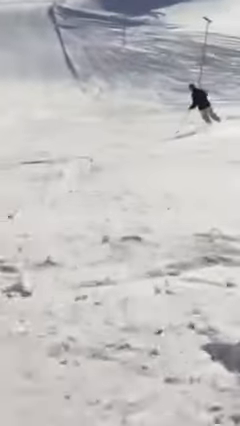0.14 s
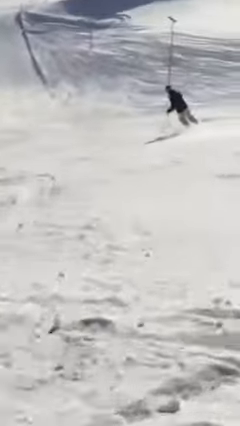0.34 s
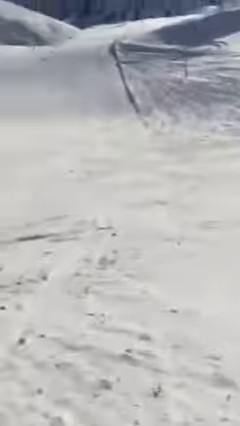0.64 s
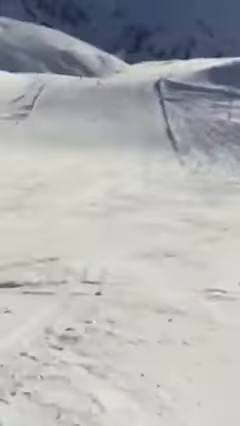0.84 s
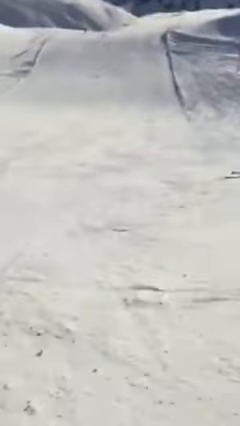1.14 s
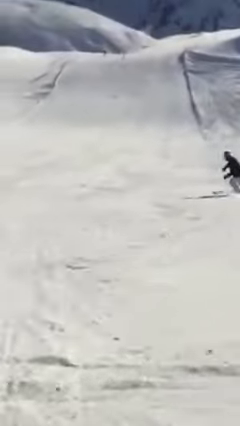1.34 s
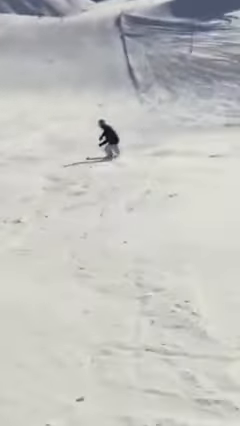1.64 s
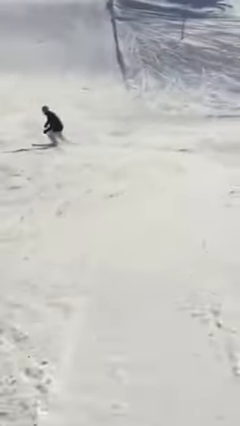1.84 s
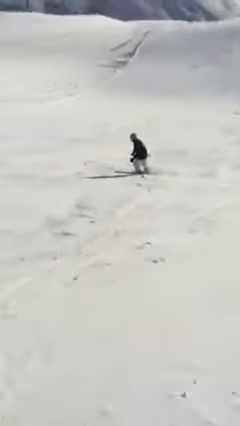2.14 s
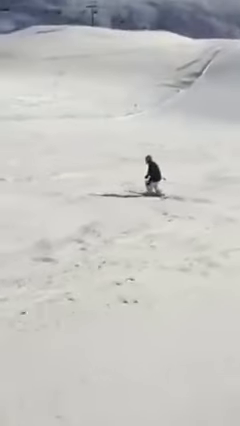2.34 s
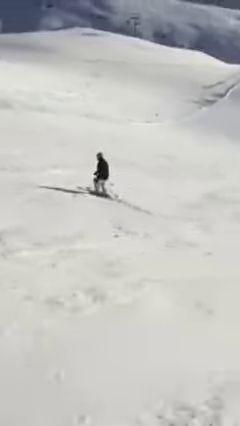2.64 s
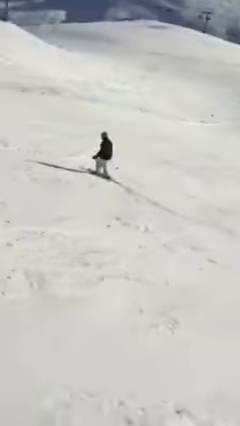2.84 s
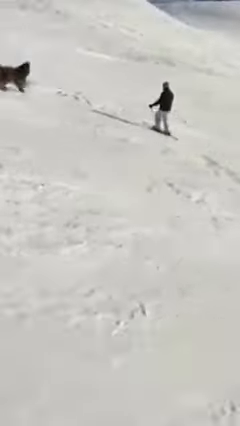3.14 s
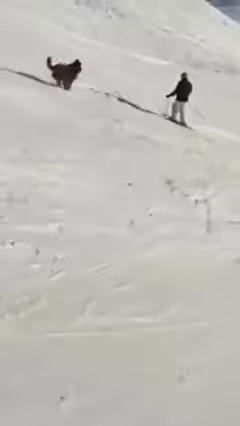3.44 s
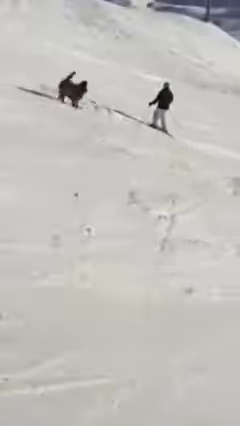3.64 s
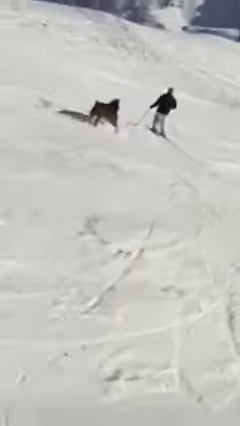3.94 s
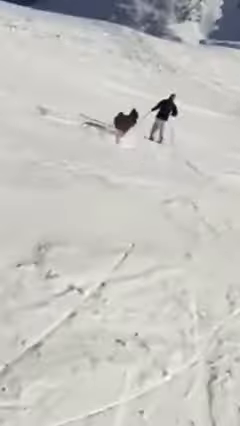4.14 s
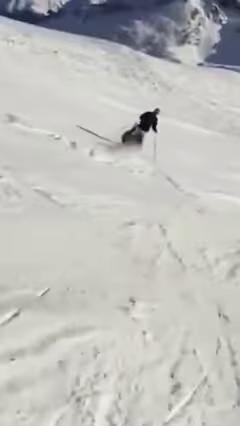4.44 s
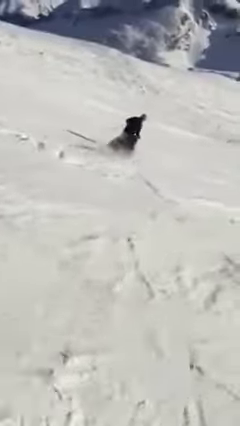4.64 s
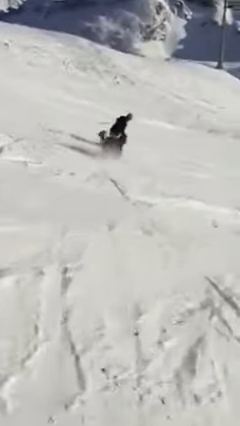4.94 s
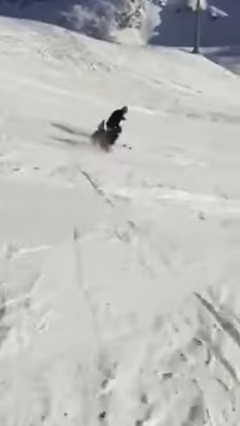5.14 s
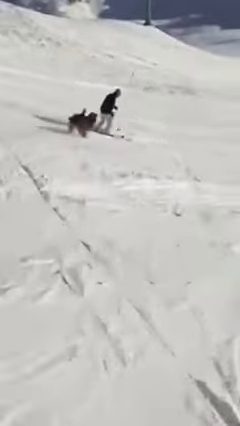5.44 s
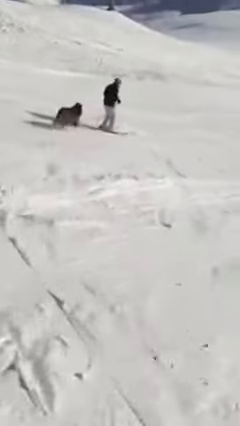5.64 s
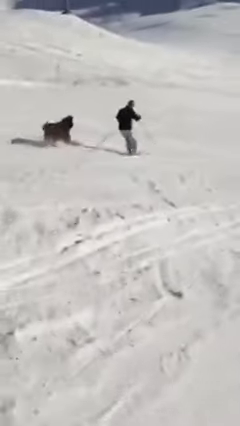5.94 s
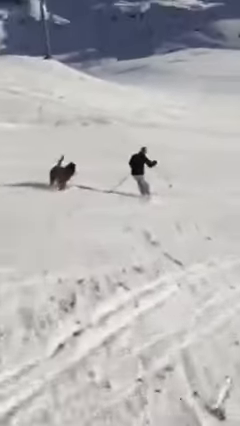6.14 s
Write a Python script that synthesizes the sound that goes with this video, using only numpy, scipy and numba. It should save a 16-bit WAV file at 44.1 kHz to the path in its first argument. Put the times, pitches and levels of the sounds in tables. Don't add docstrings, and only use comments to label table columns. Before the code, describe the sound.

A grainy rush of skis across a snowy slope swells loudest midway, with cracking crust, a plastic clack, a ski slap and wind thumps.

```python
import sys
import numpy as np
from scipy import signal
from scipy.fft import rfft, irfft, next_fast_len
from scipy.io import wavfile
from scipy.ndimage import uniform_filter1d
from numba import njit

SR = 44100
rng = np.random.default_rng(int(sys.argv[2]) if len(sys.argv) > 2 else 0)


def wav_out(sig):
    wavfile.write(sys.argv[1], SR, np.round(np.clip(np.atleast_2d(sig).T, -1, 1) * 32767).astype(np.int16))


def linear_from_db(decibels):
    return 10 ** (np.asarray(decibels, float) / 20)


N = 276948


def level(x, db):
    return x * linear_from_db(db) / np.sqrt(np.mean(x ** 2))


@njit
def svf(x, hz, width_hz):
    y = np.empty(len(x))
    band, low = 0., 0.
    g, k = np.tan(np.pi * hz / SR), width_hz / hz
    for i in range(len(x)):
        v = (band + g * (x[i] - low)) / (1 + g * (g + k))
        band = 2 * v - band
        low = low + 2 * g * v
        y[i] = k * v
    return y


def walk(rate_hz):
    hold = int(SR / rate_hz)
    steps = np.repeat(rng.standard_normal(200), hold)
    wander = uniform_filter1d(np.resize(steps, N), hold)
    wander = uniform_filter1d(wander, hold)
    return 1.5 * (wander - uniform_filter1d(wander, SR // 6))


def curves(table):
    s, *columns = np.transpose(table)
    return [np.interp(np.arange(N) / SR, s, column) for column in columns]


def press(events, attack_s, release_s):
    t, rows = np.arange(N) / SR, np.array(events)
    shapes = []
    for start_s, hold_s in rows[:, :2]:
        rise = (t - start_s) / attack_s + 0.5
        fall = (start_s + hold_s - t) / release_s + 0.5
        shapes.append(np.clip(np.minimum(rise, fall), 0, 1))
    return rows[:, 2:].T @ np.sin(np.pi / 2 * np.array(shapes)) ** 2


def ring(push, modes):
    out = 0
    for hz, width_hz, db in modes:
        part = svf(push, float(hz), float(width_hz))
        out = out + linear_from_db(db) * part / np.linalg.norm(part)
    return out / np.linalg.norm(out)


def load():
    # time in seconds, slide level in dB, spray thrown in dB re slide,
    # weight on the board in dB re slide, pitch at which the bent ski sings in Hz.
    glide = [(0.0, -41, -4.5, -6.5, 1500), (0.17, -29.5, -5, -8, 1400), (0.55, -33, -5, -5, 1410),
             (0.8, -37.5, -3.5, 2.5, 1410), (1.05, -38, -1.5, 9, 1700), (1.2, -33, 1, -7, 1920),
             (1.7, -31.5, -3.5, -4.5, 1970), (2.2, -27.5, -7.5, -9.5, 1610), (2.5, -34.5, -6.5, -7.5, 1700),
             (2.76, -38, -9, -6, 1620), (2.926, -38.5, -7, 1, 1300), (2.932, -30, -4, -8, 1500),
             (3.72, -26.5, -3, -4, 1550), (3.87, -17, -2, -11, 1340), (4.42, -21.5, -6, -5.5, 1500),
             (4.56, -26, -6.5, -8, 1440), (5.08, -29.5, -9.5, -7.5, 1450), (6.28, -34.5, -4.5, -9, 1700)]
    # start in seconds, length in seconds, scrape gain in dB, spray gain in dB.
    bites = [(0.245, 0.023, 6.5, 6), (0.46, 0.057, 4.5, 4.5), (0.64, 0.027, -2, 0.5),
             (0.71, 0.045, 4.5, -0.5), (1.195, 0.022, 6.5, -3.5), (1.24, 0.047, 12, -1),
             (1.305, 0.07, 11, 2.5), (1.43, 0.18, 5.5, -0.5), (1.75, 0.064, 8, 8.5), (1.8, 0.14, 9, 9.5),
             (1.965, 0.18, 7, 9.5), (2.29, 0.054, 1, 0), (2.56, 0.055, 5, 2.5), (2.975, .065, 4.5, 4),
             (3.06, 0.094, 2, 3), (3.28, 0.032, 4.5, 7.5), (3.36, .2, 5, 7), (3.7, 0.011, -2, 3.5),
             (3.94, 0.096, 1, 2), (4.3, 0.22, 1, 3.5), (4.59, 0.037, 3, 5.5), (4.7, 0.24, 3, 2),
             (5.17, 0.15, 2.5, 8.5), (5.33, 0.12, 2, 6), (5.55, 0.056, 4.5, 6.5), (5.742, 0.031, 6, 10.5),
             (5.8, 0.091, 7, 11), (5.925, 0.068, 7.5, 5.5), (6.18, 0.1, 7.5, 8.5), (0.3, 0.12, 2.5, 3)]
    # start in seconds, length in seconds, scrape loss in dB,
    # spray loss in dB.
    skips = [(0.58, 0.044, 6, 4.5), (3.89, 0.032, 2, 3), (1.63, 0.086, 2, 2), (2.675, 0.057, 6, 6),
             (4, 0.022, 2.5, 3.5), (3.575, 0.041, 2.5, 4.5), (2.8, 0.025, 2.5, 5.5), (3.655, 0.036, 7, 6),
             (5.1, 0.053, 5.5, -0.5), (5.48, 0.032, 2, -1.5), (5.63, 0.11, 1.5, -2), (4.3, 0.046, 1.5, 1),
             (0.283, .03, 4.5, 3), (0.11, 0.046, 3.5, 1.5)]
    # start in seconds, length in seconds, gain in dB.
    thuds = [(0.16, .06, 6.5), (0.87, 0.068, 2), (1.28, .22, -3.5), (1.55, .16, 5), (1.86, .07, 3.5),
             (2.03, .05, 5.5), (2.29, .03, 5.5), (3.15, .03, 5.5), (3.44, 0.034, 0.5), (3.9, 0.043, 4),
             (4.7, 0.24, 2.5), (5.19, 0.042, 2.5), (5.83, .04, 5.5), (6.2, 0.032, 8.5)]
    dig_s, let_go_s, skip_edge_s = 0.046, 0.095, 0.017
    drum_share, dust_share = 0.4, 0.96
    dust_thrown, dust_slide = 0.96, 0.77
    focus_per_db = 0.1

    slide_db, thrown_db, weight_db, edge_hz = curves(glide)
    bite_db = press(bites, dig_s, let_go_s)
    dig_db, throw_db = bite_db - press(skips, skip_edge_s, skip_edge_s)
    thud_db = press(thuds, skip_edge_s, skip_edge_s)[0]
    scrape_db = slide_db + dig_db
    spray_db = thrown_db + throw_db - dig_db
    drum_db = weight_db + thud_db - (1 - drum_share) * dig_db
    dust_db = dust_thrown * thrown_db + dust_share * throw_db - dig_db - (1 - dust_slide) * slide_db
    return scrape_db, spray_db, drum_db, dust_db, edge_hz, 1 + focus_per_db * dig_db


def grains(rate_hz, spread_db):
    hit = rng.random(N) < rate_hz / SR
    sign = np.sign(rng.standard_normal(N))
    size = np.minimum(rng.exponential(size=N), 5.0)
    return level(hit * sign * linear_from_db(spread_db * size), 0)


def chips():
    groups = [svf(grains(70., 3.4), hz, hz / 45.0) for hz in np.geomspace(500, 4600, num=30)]
    return level(sum(groups), 0)


def skis():
    # frequency in Hz, density in dB per Hz.
    snow_colour = [(35, -37), (60, -23), (99, -13.5), (291, 0), (449, -7.5), (570, -5.5), (1480, -4.5),
                   (2600, -7), (3090, -9.5), (4090, -9.5), (7660, -10.5), (9310, -11), (10600, -21),
                   (13800, -50), (22000, -120)]
    # frequency in Hz, width in Hz, lift in dB.
    board = [(1490, 53, 2.5), (2520, 92, 1.5), (3730, 160, 0), (7960, 2000, -3.5), (274, 105, -2.5)]
    crackle, squeak = 0.43, 0.13
    scrape_db, spray_db, drum_db, dust_db, edge_hz, focus = load()
    snow = crackle ** 0.5 * grains(2500., 3.0) + squeak ** 0.5 * chips() + 1.01 * rng.standard_normal(N)

    size = next_fast_len(N)
    hz = np.arange(1, size // 2 + 2) * SR / size
    colour_hz, density_db = np.transpose(snow_colour)
    colour_db = np.interp(np.log(hz), np.log(colour_hz), density_db)
    for mode_hz, width_hz, lift_db in board:
        colour_db = colour_db + lift_db / (1 + (2 * (hz - mode_hz) / width_hz) ** 2)
    spectrum = rfft(snow, size) * linear_from_db(colour_db)

    shake_db = 0.5 * walk(35) + 0.84 * walk(60)
    moves_db = (drum_db - drum_db.mean(), shake_db,
                spray_db - spray_db.mean() + shake_db, dust_db - dust_db.mean() + shake_db)
    out, patch = 0, walk(22)
    for step in range(16):
        centre_hz = 75 * 2 ** (step / 2)
        window = np.cos(np.pi / 2 * np.clip(2 * np.log2(hz / centre_hz), -1, 1)) ** 2
        band = irfft(spectrum * window, size)[:N]
        place = np.interp(np.log(centre_hz), np.log([420, 1050, 2400, 3600, 4800, 8300]), [0, 1, 1, 2, 2, 3])
        shares = np.clip(1 - abs(place - np.arange(4)), 0, 1)
        load_db = sum(share * move for share, move in zip(shares, moves_db))
        patch = 0.83 * patch + 0.92 * walk(20)
        near_edge = np.exp(-(np.log2(centre_hz / edge_hz) / 0.94) ** 2)
        sing_db = 2.7 * focus * (near_edge - 0.36 * shares[1])
        out = out + band * linear_from_db(sing_db + load_db + 0.6 * patch + 0.8 * walk(30))
    return level(out, 3.82) * linear_from_db(scrape_db)


def wind():
    # time in seconds, level in dB.
    gust = [(0.0, -37), (0.19, -38), (0.75, -40), (0.98, -34), (1.1, -35), (1.28, -47), (2.04, -41.5),
            (2.26, -52.5), (2.94, -44.5), (3.46, -53), (4.1, -48.5), (4.75, -61), (4.9, -48), (5.14, -27),
            (5.28, -63), (5.5, -50), (5.95, -66), (6.28, -42)]
    # start in seconds, peak in dB, boom pitch in Hz.
    eddies = [(0.007, -34, 113), (0.048, -28, 86.1), (0.111, -29, 79), (0.316, -32.5, 108),
              (0.458, -26.5, 94), (0.494, -29.5, 93), (0.523, -31, 78.1), (0.748, -33, 73),
              (0.881, -35, 69.6), (0.959, -41, 84), (1.286, -36.5, 62.5), (1.848, -40, 65), (2.19, -45, 71),
              (3.183, -44, 94.2), (3.32, -47, 70), (3.69, -44, 64.6), (4.869, -24.5, 87.5),
              (4.913, -29, 81.4), (4.954, -30, 114), (4.975, -25.5, 103), (5.021, -24, 75.4),
              (5.049, -29, 79), (5.087, -34, 113), (5.135, -24, 65), (5.161, -25, 77.6), (5.186, -22, 59.6),
              (5.253, -32, 83.4), (5.606, -40, 72.7), (5.833, -42, 61.9), (6.2, -40, 113)]
    boom_cycles = 7.7
    buffet = svf(svf(rng.standard_normal(N), 41.0, 59.0), 81.0, 120.0)
    out = level(buffet, 0) * linear_from_db(curves(gust)[0])
    for start_s, db, hz in eddies:
        side = np.sign(rng.standard_normal())
        a = int(start_s * SR)
        t = np.arange(min(9000, N - a)) / SR
        swell = (1 - np.exp(-t / 0.0092)) * np.exp(-np.log(1000) * t * hz / boom_cycles)
        turn = 2 * np.pi * hz * t * (1 - 1.5 * t)
        boom = np.sin(turn) + 0.32 * np.sin(2 * turn + 0.32)
        out[a:a + len(t)] += side * linear_from_db(db + 5.5) * swell / swell.max() * boom
    return out


def lumps():
    # start in seconds, peak in dB, centre in Hz, decay in ms.
    cracks = [(0.163, -15, 1010, 4.3), (0.23, -6.5, 1950, 2.7), (0.636, -16, 685, 3.5),
              (0.732, -14, 1250, 7.1), (1.217, -9, 1500, 4), (1.248, -11, 1610, 7.1), (2.214, -14, 1500, 4),
              (2.46, -23.5, 1490, 6.3), (2.596, -10, 1550, 4.8), (2.911, -14.5, 600, 2.8),
              (2.93, -11, 2400, 4), (2.969, -4.5, 1320, 7.9), (3.082, -5, 1450, 3.2), (3.221, -11, 2500, 3),
              (3.253, -7, 3500, 3), (3.282, -12, 2500, 3), (3.316, 2, 2550, 4.1), (3.372, -21, 2260, 4),
              (3.383, -10, 2050, 3.7), (3.412, -14, 850, 4.3), (3.485, 1, 3340, 4), (3.702, -8, 2500, 3),
              (3.785, -8, 1500, 4), (4.981, -9, 1670, 4), (5.083, -15, 1500, 4), (5.172, -10, 1800, 4),
              (5.698, -16, 1300, 4), (5.748, -16.5, 2140, 4), (5.939, -20, 2150, 4),
              (6.191, -24, 1500, 3.7)]
    out, crunch = np.zeros(N), rng.standard_normal(N)
    for start_s, db, hz, decay_ms in cracks:
        a = int(start_s * SR)
        t = np.arange(min(1500, N - a)) / SR
        envelope = np.minimum(t / 0.001, 1) * np.exp(-t / (max(decay_ms, 0.5) / 1000))
        piece = crunch[a:a + len(t)] * envelope
        pitched = svf(svf(piece, float(hz), 0.95 * hz), float(hz), 1.5 * hz)
        knock = svf(piece, 560.0, 500.)
        piece = pitched + 0.03 * piece + 0.8 * knock
        out[a:a + len(t)] += piece * linear_from_db(db - 7.5) / abs(piece).max()
    return out


def burst(start_s, hold_ms, tail_ms):
    t = np.arange(N) / SR - start_s
    fall = np.exp(-np.clip(t - hold_ms / 1000, 0, None) / (tail_ms / 1000))
    return np.clip(t * 3000, 0, 1) * fall


def clack():
    # start in seconds, level in dB, length in ms.
    start_s, db, rattle_ms = (1.11, -7.5, 11.0)
    # frequency in Hz, width in Hz, level in dB.
    pole = [(330, 200, -14), (650, 300, -12), (950, 250, -4), (1350, 250, -3), (1800, 280, 0),
            (2180, 100, -4), (2650, 350, -1), (3950, 200, -8), (5600, 700, -22), (6900, 500, -20),
            (8600, 1500, -15)]
    # start in seconds, frequency in Hz, level in dB, 60 dB decay in seconds.
    jolt_s, jolt_hz, jolt_db, t60_s = (1.1225, 75, -14, .09)
    push = np.sign(rng.standard_normal(N)) * burst(start_s, rattle_ms, 0.4)
    rattle = ring(push, pole) * linear_from_db(db) * np.sqrt(rattle_ms / 1000 * SR)
    t = np.clip(np.arange(N) / SR - jolt_s, 0, None)
    return rattle + linear_from_db(jolt_db) * np.sin(2 * np.pi * jolt_hz * t) * np.exp(-np.log(1000) * t / t60_s)


def slap():
    # time in seconds, level in dB.
    bounces = [
        (2.8948, -21),
        (2.8963, -12),
        (2.8987, -17),
        (2.9031, -8),
        (2.9052, -14),
        (2.9063, -17),
        (2.9074, -13),
    ]
    # frequency in Hz, width in Hz, level in dB.
    tail = [(330, 310, 0), (600, 220, -5), (940, 280, 1), (1400, 390, -1), (1800, 390, -13)]
    blows = np.zeros(N)
    for s, db in bounces:
        blows[int(s * SR)] = linear_from_db(db)
    contact = np.convolve(blows, np.hanning(22), "same")
    puff_decay_s = 0.0056
    puffs = signal.lfilter([1], [1, -np.exp(-1 / (puff_decay_s * SR))], blows) * rng.standard_normal(N)
    return ring(contact, tail) * linear_from_db(8.5) + ring(puffs, [(3300, 1300, 9), (6000, 1900, -12)]) * linear_from_db(0.5)


def scene():
    return np.tile(skis() + wind() + lumps() + clack() + slap(), (2, 1))


def roll_off(x):
    return signal.sosfilt(signal.butter(12, 11430, fs=SR, output="sos"), x)


def record(dry):
    top_hz, above_top_db = 10300, -55
    low_cut = signal.butter(2, 45., "high", fs=SR, output="sos")
    top_cut = signal.ellip(8, 0.2, -above_top_db, top_hz, fs=SR, output="sos")
    x = signal.sosfilt(low_cut, np.tanh(1.09 * dry) / 1.054)
    x = signal.sosfilt(top_cut, x)
    return roll_off(x)


dry = scene()
out = record(dry)
wav_out(out)
```